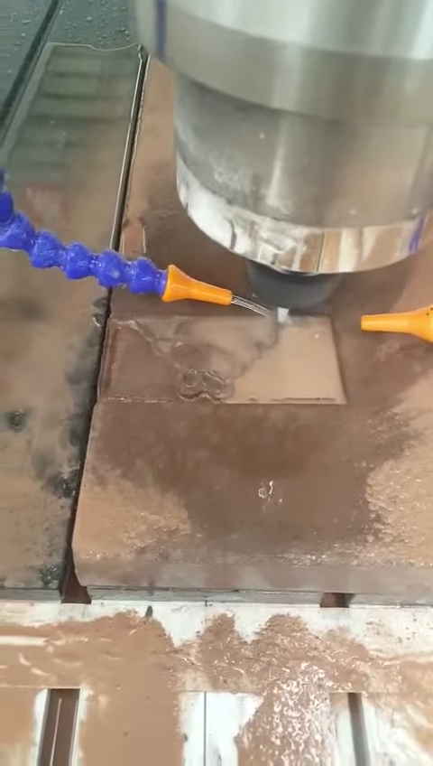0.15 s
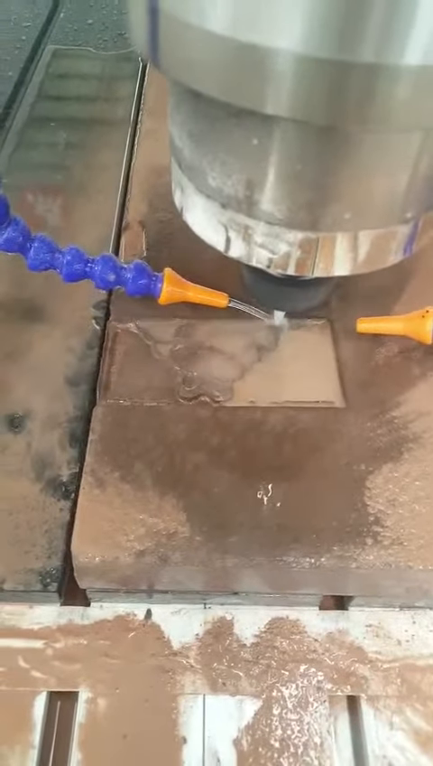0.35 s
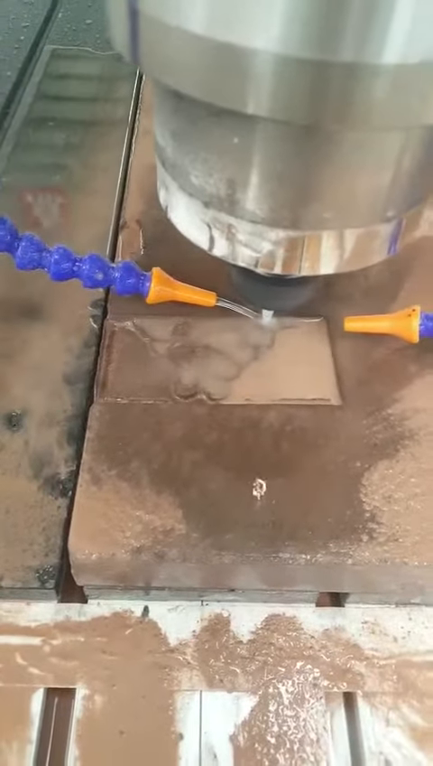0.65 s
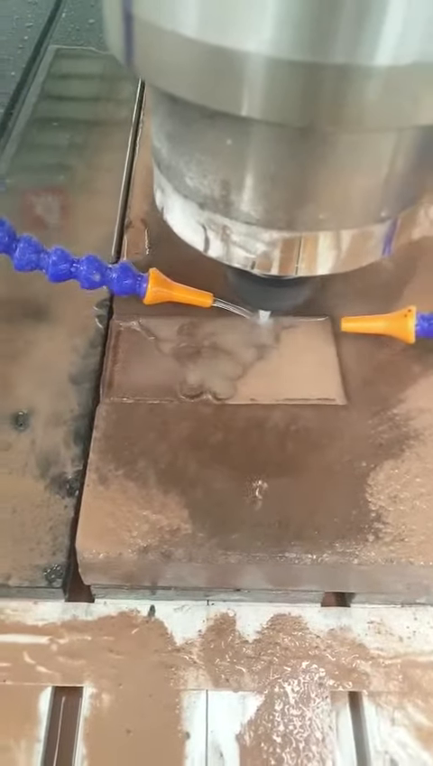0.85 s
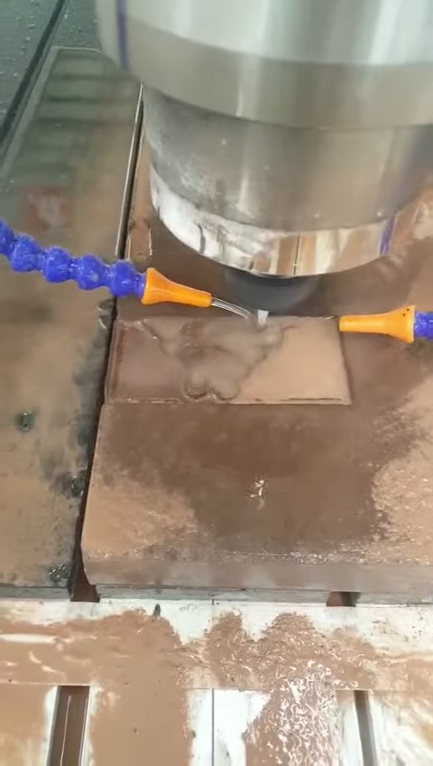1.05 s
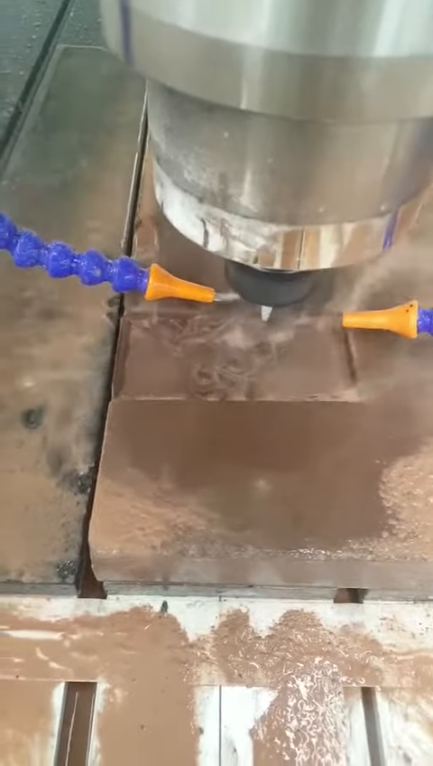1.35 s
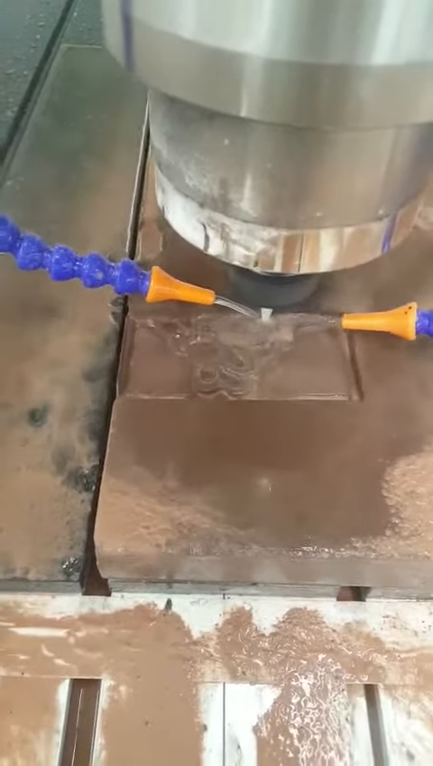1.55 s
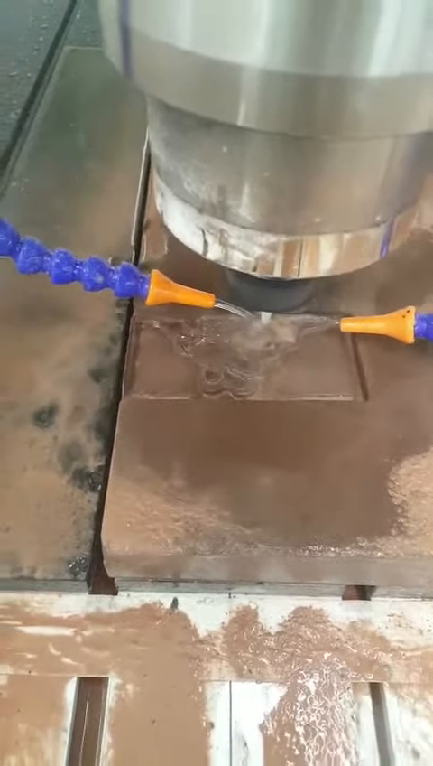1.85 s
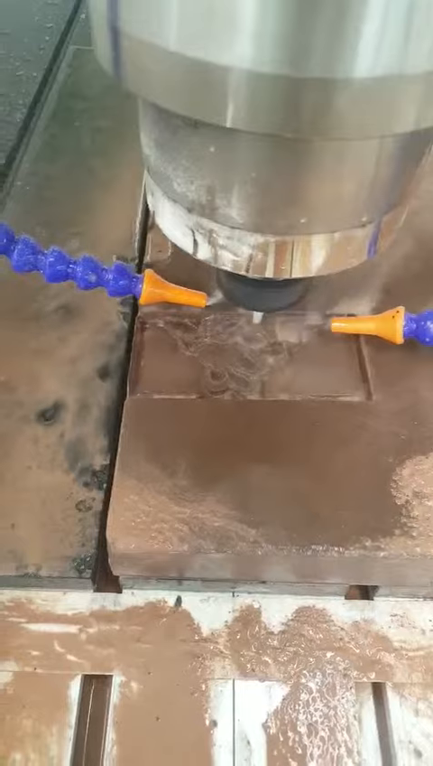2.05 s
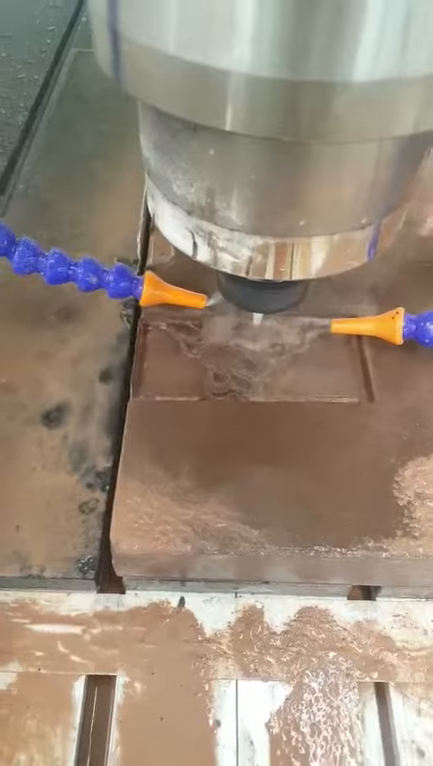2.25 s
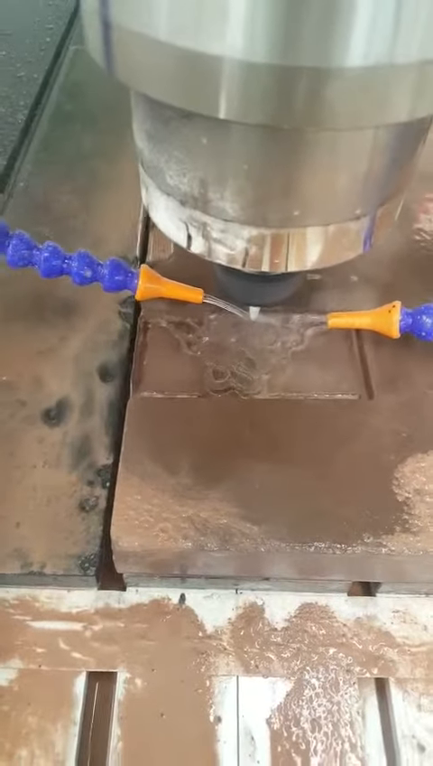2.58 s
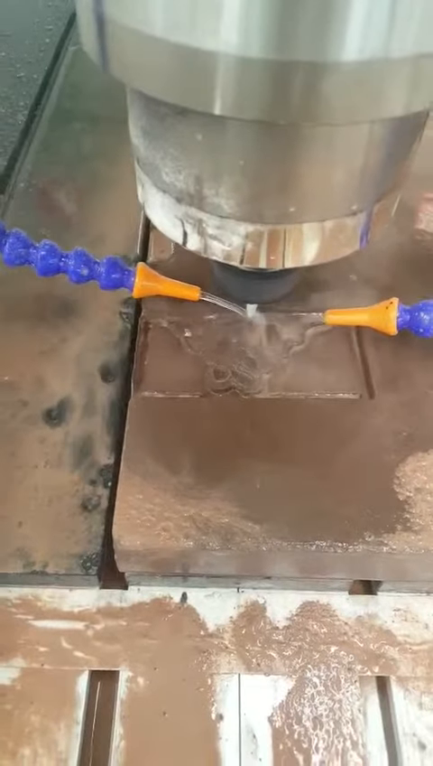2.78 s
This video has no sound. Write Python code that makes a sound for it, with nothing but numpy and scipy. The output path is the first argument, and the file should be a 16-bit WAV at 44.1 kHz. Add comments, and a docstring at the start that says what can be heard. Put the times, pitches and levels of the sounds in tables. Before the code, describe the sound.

Close stereo pickup of a stone-engraving machine: buzzing whine, wavering metallic ring and thin piercing squeal over spray and faint rumble. Four abrupt compressed-air bursts then overwhelm it, ducking the level, before the whine continues alone.

```python
"""An engraving spindle turns about 400 times a second and cuts wet stone: a hum of sine lines on the shaft orders,
a housing that rings as a narrow noise band, and a squealing cutter with side lines one turning rate apart.
Four blasts from an air gun hiss as bursts of noise and buffet the microphone ports.
Water spray, grinding stone and machine rumble lie behind as coloured stereo noise.
The recorder's gain control ducks loud moments at once and recovers very slowly."""
import sys
import numpy as np
from scipy import signal
from scipy.fft import rfft, irfft, next_fast_len
from scipy.io import wavfile

SR = 44100
rng = np.random.default_rng(int(sys.argv[2]) if len(sys.argv) > 2 else 0)


def pcm_store(signal):
    """Save signal as 16-bit PCM."""
    levels = np.round(np.clip(np.atleast_2d(signal), -1, 1) * 32767)
    wavfile.write(sys.argv[1], SR, levels.astype(np.int16).T)


def gain_from_db(level_db):
    """Turn a decibel level (scalar or array-like) into a linear amplitude factor."""
    decades = np.asarray(level_db, float) / 20
    return 10 ** decades


N = 128772
TURNS_HZ = 399.65
SIDE = np.array([[1], [-1]])  # left, right


def rms_one(x):
    """Scale to unit rms."""
    return x / np.sqrt(np.mean(x ** 2) + 1e-20)


def right_only(db):
    """Level offset of the right channel alone."""
    return np.array([[0], [db]])


def drift(rate_hz):
    """Slow chance: coarse noise through a double one-pole low-pass; spread 1."""
    r = np.exp(-80 * np.pi * rate_hz / SR)  # one value every 40 samples
    noise = rng.standard_normal(N // 40 + 2002)
    slow = signal.lfilter([1], [1, -2 * r, r * r], noise)[2000:]
    return np.interp(np.arange(N) / 40, np.arange(len(slow)), rms_one(slow))


def narrow(width_hz):
    """Complex noise around zero hertz: the envelope of a noise-driven resonance."""
    r = np.exp(-np.pi * width_hz / SR)
    noise = rng.standard_normal(N + 2000) + 1j * rng.standard_normal(N + 2000)
    z = signal.lfilter([1], [1, -2 * r, r * r], noise)[2000:]
    return z / np.sqrt(np.mean(abs(z) ** 2) / 2)


def stereo_pair(a, b, alike):
    """Left and right of a given likeness, mixed from two unrelated noises."""
    return np.sqrt(1 + alike) * a + SIDE * np.sqrt(1 - alike) * b


def split(x, hz):
    """Low and high part that add up flat."""
    return [signal.sosfilt(np.vstack([signal.butter(2, hz, kind, fs=SR, output="sos")] * 2), x)
            for kind in ("low", "high")]


def coloured(table, shared_db, own_db, rate):
    """Stereo noise with colour, balance, likeness and lead; half-octave bands flicker together and alone."""
    size = next_fast_len(N)
    hz = np.arange(size // 2 + 1) * SR / size + 1
    at_hz, *cols = np.transpose(table)
    db, left_minus_right_db, alike, lead = [np.interp(np.log(hz), np.log(at_hz), c) for c in cols]
    a, b = rfft(rng.standard_normal((2, size)))
    pair = stereo_pair(a, b, np.clip(alike, -1, 1))
    spectrum = gain_from_db(db + SIDE * left_minus_right_db / 2) * np.exp(.5j * SIDE * lead) * pair
    out, together = 0, drift(rate / 2)
    for centre in np.arange(8, 30):  # in half octaves above 1 Hz
        share = np.clip(1 - abs(2 * np.log2(hz) - centre), 0, 1) ** .5
        flicker = gain_from_db(shared_db * together + own_db * drift(rate))
        out = out + irfft(spectrum * share, size)[:, :N] * flicker
    return rms_one(out)


def shaft(t, load_db, second_db, fifth_db):
    """Steady lines on multiples of the turning rate, each wandering and following the cutting load."""
    # Shaft orders: (multiple of the turning rate, left rms before load [dB], right rms before load [dB],
    #  left leads [rad], share of the cutting load [dB per dB])
    order_lines = [(1, -33, -32, .55, .1), (2, -34, -36, -.6, .1), (3, -30, -40, -2.2, 1.2),
                   (4, -19, -26, -2.1, .9), (5, -19, -22, -2.6, .1), (6, -38, -38, .1, .2),
                   (21, -33, -58, 0, 1.1), (22, -33, -57, 1.1, .6)]
    moved = t > 1.3  # s; the head has moved across
    out = np.zeros((2, N))
    for order, left_db, right_db, lead, load_share in order_lines:
        order = round(order)
        phase = 2 * np.pi * order * TURNS_HZ * t + rng.uniform(0, 2 * np.pi) + 0.23 * drift(13.0)
        level_db = np.array([[left_db], [right_db]]) + load_share * load_db + 0.97 * drift(3.25)
        if order == 2:
            level_db = level_db + second_db
        if order == 3:
            level_db = level_db - 13 * moved
        if order == 4:
            level_db = level_db + moved * right_only(8.5)
            lead = lead + 0.37 * moved
        if order == 5:
            level_db = level_db + fifth_db
        out += np.sqrt(2) * gain_from_db(level_db) * np.sin(phase + lead * np.array([[1], [0]]))
    return out


def housing(t, ring_db):
    """Grinding noise rings one broad, wavering mode of the spindle housing."""
    mode_hz, width_hz, wander_hz = 2327, 105, 30.4
    alike, left_leads_rad = 0.93, 0.37
    pair = stereo_pair(narrow(width_hz), narrow(width_hz), alike) / np.sqrt(2)
    pair = pair * np.exp(.5j * SIDE * left_leads_rad)
    phase = 2 * np.pi * (mode_hz * t + wander_hz * np.cumsum(drift(10.6)) / SR)
    return gain_from_db(ring_db) * (pair * np.exp(1j * phase)).real


def squeal(t, squeal_db, tilt_db):
    """A wandering mode of the cutter, driven by friction, with side lines at turning-rate steps on a broad skirt."""
    mode_hz, width_hz, far_width_hz, wander_hz = 8714, 45, 99, 25.07
    own = 0.54  # power share of each line's own waver
    right = gain_from_db(right_only(-29.5))
    far = gain_from_db(-25.5 + right_only(-12.5))
    phase = 2 * np.pi * (mode_hz * t + wander_hz * np.cumsum(drift(7.1)) / SR)
    shared = narrow(width_hz)
    steps = np.arange(-4, 18)
    near = gain_from_db(-2.8 * steps[:, None] ** 2 + steps[:, None] * tilt_db)
    near = near / np.sqrt(np.sum(near ** 2, axis=0))
    tone = 0
    for k, share in zip(steps, near):
        own_waver = narrow(width_hz if k < 3 else far_width_hz)
        waver = np.sqrt(1 - own) * shared + np.sqrt(own) * own_waver
        line_phase = phase + 2 * np.pi * (k * TURNS_HZ * t + rng.random())
        line = (waver * np.exp(1j * line_phase)).real * gain_from_db(0.77 * drift(8.5))
        tone = tone + line * (share * right + (k > 2) * far)
    skirt = gain_from_db(-7) * (narrow(960) * np.exp(2j * np.pi * 8910 * t)).real
    return gain_from_db(squeal_db + 3.6 * drift(4.3)) * (tone + skirt * right)


def air_gun(t):
    """Each blast rises, swells and stops short with a brief tail; the gust reaches the ports later and sags."""
    # Air blasts: (start [s], end [s], hiss [dB], extra bite over the hiss [dB], buffet [dB],
    #  buffet arrives after start [s], buffet peaks after start [s], howl from [Hz], howl to [Hz])
    blasts = [(1.128, 1.389, -3.5, -4.5, -7.5, 0.0847, 0.14, 220, 330),
              (1.528, 1.742, -2.5, -7.5, -6, 0.089, 0.068, 240, 598),
              (1.86, 2.079, -3, -5, -6.5, 0.072, 0.12, 380, 783),
              (2.185, 2.386, -4.5, -5, -9, 0.074, 0.093, 340, 477)]
    # Hiss of the jet, unrelated at the two ports: (frequency [Hz], relative density [dB], left minus right [dB])
    hiss_bands = [(273, -18.5, 8), (1020, -5, 2.5), (2300, -1.5, 0.5), (3200, 0.5, -2), (4070, -5.5, 0),
                  (5950, -10, -9.5), (7400, -12, 17), (9700, -15, 18), (11700, -9, 4.5), (16300, -9.5, 8.5)]
    # Air buffeting the ports: (frequency [Hz], relative density [dB], likeness of the ports [-1 to 1])
    buffet_bands = [(25, -29, .2), (60, -32, 0), (116, -5, 0.00044), (220, -3.5, -0.044), (514, 2.5, 0.13),
                    (1130, -4.5, 0.22), (2000, -36, 0)]
    rise_db_per_s, fall_db_per_s = 437, 1494
    swell_s, swell_db_per_s, bite_swell_db_per_s = 0.053, 70, 70
    hiss, roar, bite, buffet = np.zeros((4, N))
    for start, end, hiss_db, bite_db, buffet_db, arrive, lag, *_ in blasts:
        full = start + 25 / rise_db_per_s  # end of the fast rise
        peak = start + lag
        still_to_swell = np.clip(full + swell_s - t, 0, swell_s)
        after = np.maximum(t - end, 0)
        fall = gain_from_db(-fall_db_per_s * after)
        tail = gain_from_db(-15.5 - 224 * after)
        rise_db = -rise_db_per_s * np.maximum(full - t, 0) - swell_db_per_s * still_to_swell
        shape = gain_from_db(hiss_db + rise_db) * (fall + tail)
        come = gain_from_db(-1000 * np.maximum(start + arrive - t, 0))
        hiss += shape
        bite += shape * gain_from_db(bite_db - bite_swell_db_per_s * still_to_swell)
        roar += shape * np.sqrt(come)  # the jet's lower part arrives with the gust
        sag_db = -159 * np.maximum(peak - t, 0) - 70 * np.maximum(t - peak, 0)
        buffet += come * fall * gain_from_db(buffet_db + sag_db)

    jet = coloured([(*row, 0, 0) for row in hiss_bands], shared_db=-0.18, own_db=2.0, rate=27.0)
    low, high = split(jet, 2300)
    gust = coloured([(hz, db, 1, alike, 0) for hz, db, alike in buffet_bands],
                    shared_db=1.5, own_db=5.0, rate=20.4)

    # Each gust howls in a low band that climbs during the blast.
    howl_times = np.ravel([(b[0] + b[5], b[1]) for b in blasts])
    howl_hz = np.interp(t, howl_times, np.ravel([b[7:] for b in blasts]))
    howl_noise = np.array([narrow(119), narrow(119)])
    howl = gain_from_db(-6) * (howl_noise * np.exp(2j * np.pi * np.cumsum(howl_hz) / SR)).real

    bite_band = signal.butter(2, [2960, 6400], "band", fs=SR, output="sos")
    sharp = rms_one(signal.sosfilt(bite_band, rng.standard_normal((2, N))))
    return roar * low + hiss * high + bite * gain_from_db(0.87 * drift(20.0)) * sharp + buffet * (gust + howl)


def spray(t, spray_db):
    """Water spray as flickering broadband noise; its treble thins after the last blast."""
    # Spray: (frequency [Hz], relative density [dB], left minus right [dB], likeness [-1 to 1], left leads [rad])
    spray_bands = [(300, -16.5, 2, 1, 0.8), (1065, -28.5, -26, 0.24, -1.5), (1454, 2.5, 18, 0.73, 5),
                   (1746, 2, 7, 0.97, 3), (2840, 8, -3.5, 0.4, 12.5), (4400, -5.5, -4, 0.22, 10.5),
                   (5920, -2, 2.5, 0.12, 15.5), (6730, -12.5, 12, 0.11, 19), (9560, -1, 9, 0.086, 14),
                   (9130, -37, -6, 0.12, -1), (12400, -6.5, 8, .1, 9), (16500, -24, 11, .1, 13)]
    low, high = split(coloured(spray_bands, shared_db=0.2, own_db=1.64, rate=19.0), 9800)
    return gain_from_db(spray_db) * (low + high * gain_from_db(-5 * (t > 2.46)))


def grinding(grind_db):
    """Stone grinding away in the low mids, as flickering noise."""
    # Grind: (frequency [Hz], relative density [dB], left minus right [dB], likeness [-1 to 1], left leads [rad])
    grind_bands = [(120, -14.5, 2, 0.51, 0.5), (286, -8, -6.5, 0.51, 1.2), (670, -0.5, 6, 1, -1.46),
                   (1170, 0.5, 2, 0.41, 6), (2240, -14.5, 11.5, 0.15, 0.5)]
    return gain_from_db(grind_db) * coloured(grind_bands, shared_db=2.0, own_db=1.0, rate=15.3)


def rumble(rumble_db):
    """Rumble of the machine bed: low noise, nearly the same at both ports in the deepest bass."""
    # Rumble: (frequency [Hz], relative density [dB], left minus right [dB], likeness [-1 to 1], left leads [rad])
    rumble_bands = [(22, -13, 0, 0.99, 0), (60, -3, .3, 0.99, 0), (188, -2, .3, 1, 0),
                    (360, -15.5, 0, 0.31, 0)]
    return gain_from_db(rumble_db) * coloured(rumble_bands, shared_db=2.5, own_db=2.5, rate=22.0)


def scene():
    """Spindle, air gun, spray, grinding and rumble, following the course of the cut."""
    # Course of the cut: (time [s], cutting load [dB], housing ring [dB], cutter squeal [dB],
    #  squeal tilt [dB per side line], spray [dB], grind [dB], rumble [dB],
    #  second order wavers [dB], fifth order wavers [dB])
    cut_course = [(0, -1, -27, -29, -4, -21.5, -29, -42.5, 2.5, 3.5),
                  (.15, -6, -26, -21.5, -0.5, -22, -30.5, -29.5, 1.5, -2),
                  (.28, -18.5, -26.5, -17.5, 1.5, -21.5, -29.5, -38, 0.5, -10),
                  (.45, -7.5, -27, -20, 0.5, -22, -32, -35.5, 6.5, -3.5),
                  (.56, 2, -23.5, -21, -1.5, -20, -28.5, -31.5, 5.5, 0),
                  (.73, 2.5, -23.5, -18, -3.5, -20.5, -34.5, -35, -11, 4),
                  (.92, 1, -24.5, -22, -0.5, -21, -33, -40, 6.5, -11.5),
                  (1.06, 1.5, -25.5, -14.5, -2.5, -21, -28, -33, 5, 1.5),
                  (1.13, -3, -24, -15, 0, -22, -34, -33, 7.5, -0.5),
                  (1.19, -3.5, -19.5, -19.5, 0, -25, -30, -36, 5.5, 9),
                  (1.42, -7.5, -22, -20.5, 0, -23, -35, -57, -8, 2.5),
                  (1.55, -9, -22.5, -23, 0.5, -20.5, -28, -40, 4.5, 3),
                  (1.77, -9, -25, -15, 4, -17, -32, -58, -2, 1),
                  (1.83, -1, -20, -20.5, 0, -21, -31.5, -58, -20, 0),
                  (1.9, -1, -24.5, -30, 20, -20, -24, -55, -10, 3),
                  (2.11, -13, -21, -14.5, 4, -18.5, -33, -51, 2, 1),
                  (2.15, -13, -23.5, -15, -1, -22, -28, -47, 4, -5),
                  (2.19, -15, -23, -12.5, 8, -24.5, -33, -48, 0, -5),
                  (2.42, -10, -23, -15.5, 3, -18.5, -27.5, -54, 8, 4),
                  (2.5, -25, -18, -43, 0, -23.5, -35, -53, 3.5, -24),
                  (2.59, -12, -19.5, -24, -3, -21.5, -27, -39, 0, 5),
                  (2.691, -14, -23.5, -27, 3, -21, -25, -36, -1, -9),
                  (2.74, -20, -27.5, -30, 0, -21.5, -35.5, -33, -5, -31),
                  (2.92, -14, -24, -11.5, 2.5, -22, -32, -39, 6.5, -13.5)]
    t = np.arange(N) / SR
    at_s, *cols = np.transpose(cut_course)
    (load_db, ring_db, squeal_db, tilt_db, spray_db, grind_db, rumble_db,
     second_db, fifth_db) = [np.interp(t, at_s, c) for c in cols]
    spindle = shaft(t, load_db, second_db, fifth_db) + housing(t, ring_db) + squeal(t, squeal_db, tilt_db)
    background = spray(t, spray_db) + grinding(grind_db) + rumble(rumble_db)
    return spindle + air_gun(t) + background


def top_cut(x):
    """Nothing passes above the cut-off."""
    return signal.sosfilt(signal.butter(12, 15910, fs=SR, output="sos"), x)


def record(dry):
    """Gain control with quick attack and very slow recovery, rounded peaks, both ends of the spectrum cut."""
    threshold_db, window_s, attack_s, recover_db_per_s = -10.5, 0.0026, 0.0008, 3.8
    t = np.arange(N) / SR
    r = np.exp(-1 / (window_s * SR))
    power = signal.lfilter([1 - r], [1, -r], np.mean(dry ** 2, axis=0))
    over_db = np.maximum(10 * np.log10(power + 1e-12) - threshold_db, 0)
    # Hold the largest excess, let down by the slow recovery.
    held_db = np.maximum.accumulate(over_db + recover_db_per_s * t) - recover_db_per_s * t
    r = np.exp(-1 / (attack_s * SR))
    duck_db = signal.lfilter([1 - r], [1, -r], held_db)
    mix = 1.357 * np.tanh(dry * gain_from_db(-duck_db) / 1.223)
    mix = signal.sosfilt(signal.ellip(12, .3, 70, 16000, fs=SR, output="sos"), mix)
    mix = signal.sosfilt(signal.butter(2, 45, "high", fs=SR, output="sos"), mix)
    return top_cut(mix)


dry = scene()
out = record(dry)
pcm_store(out)
```